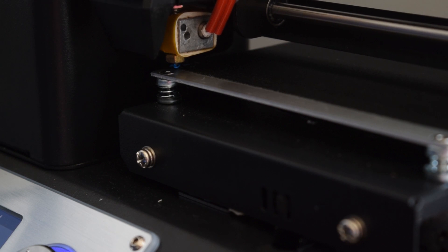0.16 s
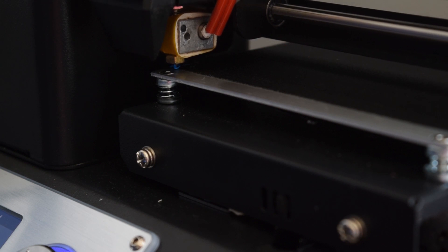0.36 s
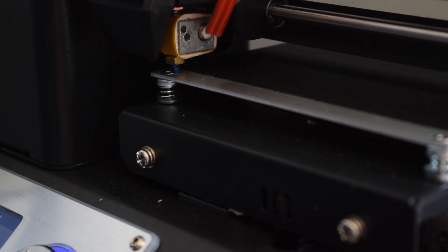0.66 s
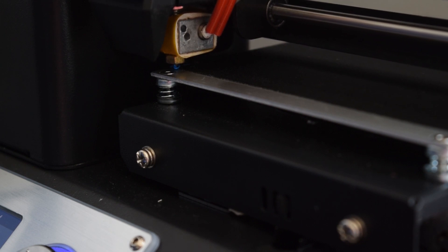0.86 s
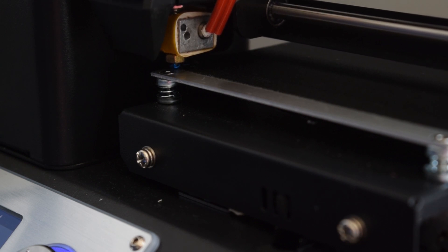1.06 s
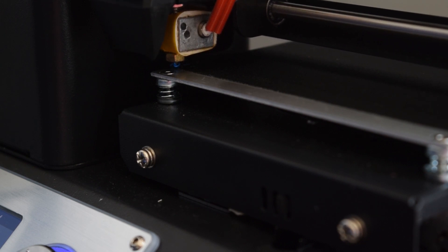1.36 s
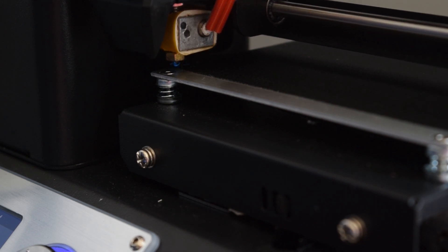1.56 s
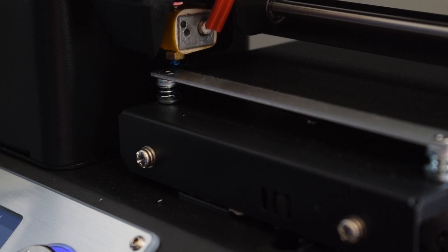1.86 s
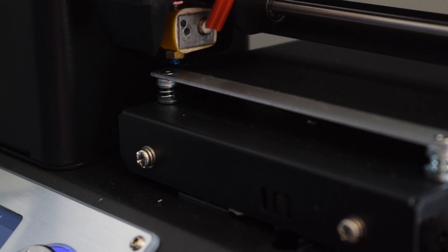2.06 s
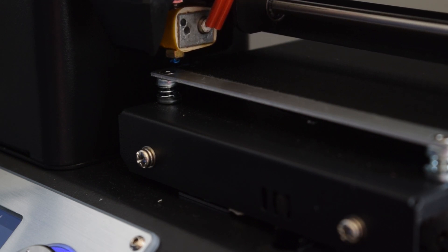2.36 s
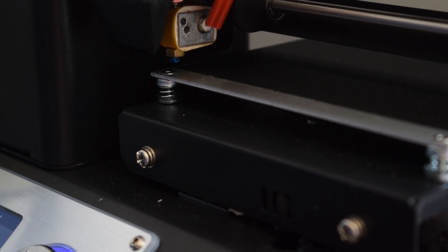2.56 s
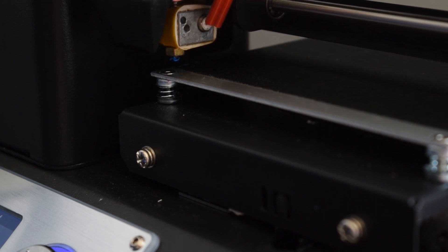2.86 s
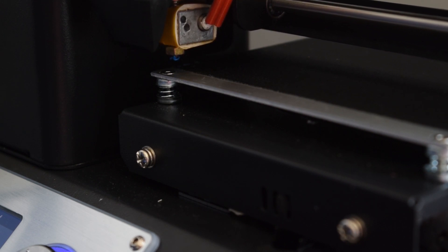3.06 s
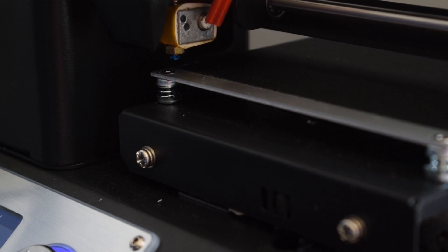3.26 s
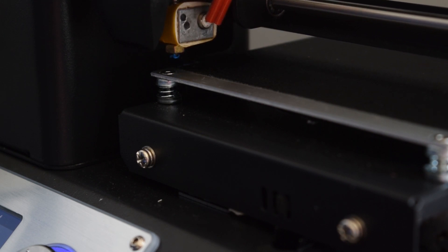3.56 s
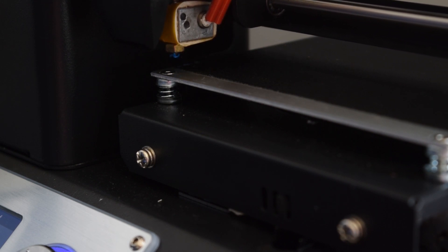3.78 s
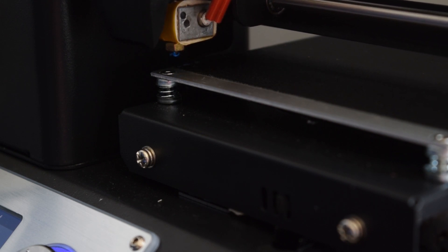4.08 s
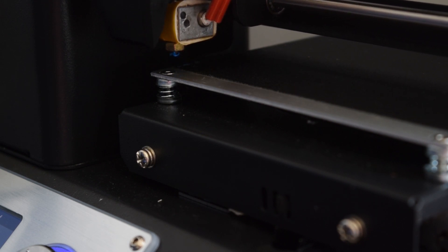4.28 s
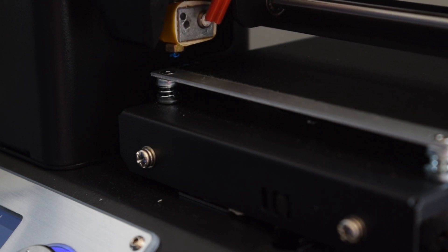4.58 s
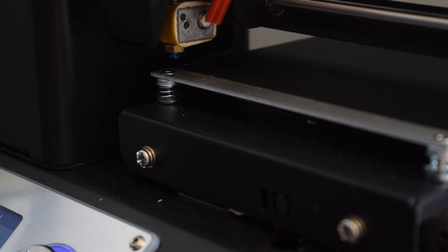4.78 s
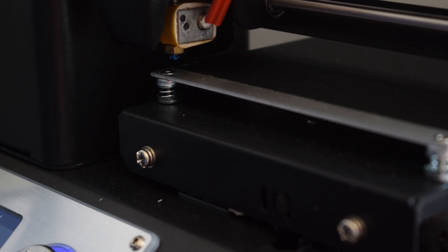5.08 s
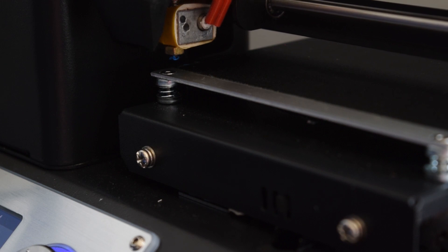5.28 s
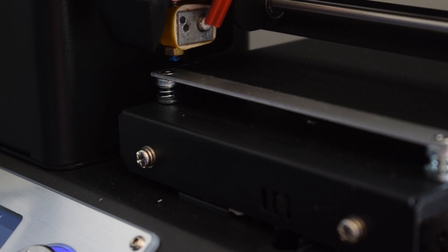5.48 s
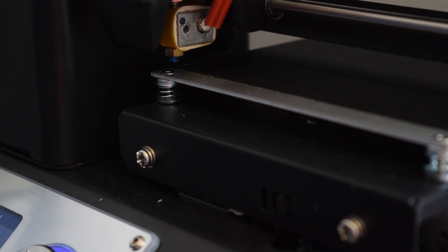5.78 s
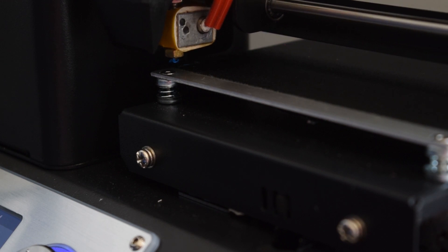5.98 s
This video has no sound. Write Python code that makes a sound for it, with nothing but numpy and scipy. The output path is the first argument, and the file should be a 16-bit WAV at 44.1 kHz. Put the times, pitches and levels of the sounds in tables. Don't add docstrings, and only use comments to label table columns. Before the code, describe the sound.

Close to the microphone in a quiet room, a small desktop printer's fan hums low and airy. After small plastic clicks, a stepper motor spins up into a steady, grainy, multi-toned whine with tiny high squeaks that recur. It stops abruptly, leaving a faint pulsing whine and a click. Then a far louder low thump slams the microphone into clipping, with wobbling bass and a brief rustle, before fan hum and a last click.

```python
import sys
import numpy as np
from scipy import signal
from scipy.fft import rfft, irfft, next_fast_len
from scipy.io import wavfile
from scipy.ndimage import uniform_filter1d, map_coordinates

SR = 44100
rng = np.random.default_rng(int(sys.argv[2]) if len(sys.argv) > 2 else 0)


def digitize_waveform(pressure):
    field = np.atleast_2d(pressure).T
    bounded = np.clip(field, -1, 1)
    quanta = np.round(bounded * 32767).astype(np.int16)
    wavfile.write(sys.argv[1], SR, quanta)


def linear_from_db(decibels):
    return 10 ** (np.asarray(decibels, float) / 20)


N = 270271
T = np.arange(N) / SR
STOP_S = 4.3


def unit(x):
    return x / np.sqrt(np.mean(x ** 2) + 1e-20)


def wobble(rate):
    coarse = T[::32]
    knots = rng.standard_normal(int(N * rate / SR) + 4)
    return np.interp(T, coarse, map_coordinates(knots, [coarse * rate]))


def noise(gain):
    m = next_fast_len(N)
    hz = np.fft.rfftfreq(m, 1 / SR) + 1
    white = rng.standard_normal(len(hz)) + 1j * rng.standard_normal(len(hz))
    return unit(irfft(white * gain(hz), m)[:N])


def shape(points):
    f, db = np.transpose(points)
    return lambda hz: linear_from_db(np.interp(np.log(hz), np.log(f), db, -120, -120))


def peak(centre_hz, width_hz):
    return lambda hz: 1 / (1 + ((hz - centre_hz) / (width_hz / 2)) ** 2)


def resonances(modes):
    return sum(linear_from_db(db) * noise(peak(hz, width_hz)) for hz, width_hz, db in modes)


def tone(hz):
    return np.sqrt(2) * np.sin(2 * np.pi * (np.cumsum(hz + 0 * T) / SR + rng.random()))


def bell(s, width):
    return np.exp(-((T - s) / width) ** 2)


def held(start, attack, hold, release_db, db):
    rise = np.sin(np.pi / 2 * np.clip((T - start) / attack, 0, 1)) ** 2
    fall_db = release_db * np.maximum(T - start - attack - hold, 0)
    return uniform_filter1d(rise * linear_from_db(db - fall_db), size=300)


# t/s, level/dB over rest
SHUDDERS = [
    (.13, 7),
    (.3, 7),
    (.72, 8),
    (1.06, 5),
    (1.33, 3),
    (1.63, 6),
    (4.32, 6),
    (4.75, 4),
    (5.97, 2),
]
# f/Hz, width/Hz, level/dB
CASE_MODES = [(435.6, 58, -2.5), (908, 81, -8.5), (1103, 14, -15.5)]
# f/Hz, level/dB per Hz
AIR_COLOUR = [(59, -55), (100, -13), (166, -8.5), (201, -10.5), (265, -14), (356, -14.5), (579, -14.5),
              (671, -18), (903, -24.5), (1240, -18), (1350, -21.5), (2710, -30.5), (15700, -45.5)]


def fan():
    shudder_db = sum(db * bell(s, .045) for s, db in SHUDDERS)
    sag_db = -20 * bell(.605, .03)
    blade_db = -55.3 + sag_db + 0.32 * wobble(25)
    blade = linear_from_db(blade_db) * tone(197.7 + 0.71 * wobble(8))

    stirred = held(start=5.15, attack=.3, hold=.2, release_db=4, db=-60)
    air_level = np.hypot(linear_from_db(-58.3), stirred)
    air = air_level * linear_from_db(0.4 * wobble(1.8)) * noise(lambda hz: shape(AIR_COLOUR)(hz) * (hz > 100))

    case = linear_from_db(-60) * resonances(CASE_MODES)
    frame_boom = linear_from_db(-62 + shudder_db) * noise(peak(70.6, 20))
    desk_rumble = linear_from_db(-59 + .4 * shudder_db + 2.5 * wobble(9)) * noise(peak(30, 40))
    slow_rumble = linear_from_db(-54) * noise(peak(6, 15))
    return blade + air + case + frame_boom + desk_rumble + slow_rumble


# t/s, level/dB, time to fade by 60 dB/s, f/Hz, width/Hz
CLICKS = [(.195, -67, .5, 9300, 3000), (.2, -64, 0.45, 4930, 3000), (.528, -64, 0.19, 10300, 3000),
          (.528, -65, 0.17, 14500, 4000), (.528, -59, .2, 5000, 5000), (.738, -61, .2, 5700, 2000),
          (.738, -62, 0.2, 11500, 5000), (.98, -69, .6, 8000, 8000), (4.688, -60, 0.52, 7300, 4480),
          (4.97, -73, 0.39, 5500, 4000), (5.762, -57.5, 0.5, 6800, 2800), (5.764, -63.5, .3, 11000, 4000),
          (5.762, -58.5, 0.49, 2330, 1200)]
# (t/s, level/dB, time to fade by 60 dB/s),
# then a list of f/Hz, width/Hz, level/dB
RINGING_PARTS = [
    ((0.529, -57, .2), [(1230, 80, 0), (1880, 120, -6), (2120, 120, -5), (5500, 400, -6), (6500, 120, -10), (10100, 200, -11)]),
    ((0.737, -58.5, .22), [(5270, 90, 3.5), (5600, 300, -3), (6480, 90, -3), (7300, 200, -11), (10900, 400, -8), (12600, 400, -10), (15600, 150, -8)]),
    ((5.764, -59.5, 0.45), [(2430, 200, -2), (6000, 370, 0), (8000, 500, -2), (9870, 200, -10)]),
]


def clicks():
    def dying(s, db, t60):
        age = np.maximum(T - s, 0)
        return linear_from_db(db - 60 * age / t60) * (1 - np.exp(-age / 0.0025))

    out = 0
    for s, db, t60, hz, width_hz in CLICKS:
        out = out + dying(s, db, t60) * noise(peak(hz, width_hz))
    for start, modes in RINGING_PARTS:
        out += dying(*start) * resonances(modes)
    return out


# t/s, length/s, f/Hz, glide/Hz, arch of the pitch/Hz
SQUEAKS = [
    (1.34, .04, 9750, 100, 350),
    (1.38, .045, 9800, 1000, 100),
    (1.487, .068, 9350, -650, 850),
]


def lead_screw():
    out = 0
    for (s, length, hz, glide_hz, arch_hz), db in zip(SQUEAKS, (-82, -75, -77)):
        u = np.clip((T - s) / length, 0, 1)
        arch = np.sin(np.pi * u)
        out = out + linear_from_db(db + 1.5 * wobble(40)) * arch * tone(hz + glide_hz * u + arch_hz * arch)
    return out


def holding_whine():
    beat_db = -9 * np.sin(np.pi * 4.7 * (T - 4.57)) ** 2
    hold_db = -61 - 4 * (T - STOP_S) + beat_db
    return (T > STOP_S) * linear_from_db(hold_db + 1.1 * wobble(30)) * tone(917 + 2.5 * wobble(15))


# t/s, share of full speed
MOTOR_SPEED = [
    (0, .75),
    (.53, .75),
    (.6, .9),
    (.67, 1),
    (7, 1),
]
# f/Hz, level/dB
STEP_TONES = [(242.2, -70), (419.9, -55), (522.2, -74), (559.9, -74), (699.8, -65.5), (742.9, -70.5),
              (839.8, -77), (882.8, -76), (909.8, -72.5), (979.8, -78)]
# f/Hz, level/dB
FRAME_TONES = [(1023, -72), (1120, -74), (1163, -62), (1260, -78), (1303, -78), (1497, -82), (1912, -82),
               (2368, -86), (2423, -85), (1443, -78), (1583, -77), (1863, -81), (2196, -85), (2466, -84)]
# f/Hz, level/dB
DRIVER_TONES = [(2745, -88), (3165, -88), (3736, -88.5), (4005, -91), (4603, -90), (4743, -81.5),
                (4883, -90), (5163, -91), (5351, -89), (5626, -90), (5766, -93), (6600, -94), (7908, -94),
                (8188, -95)]
# f/Hz, level/dB
FAINT_DRIVER_TONES = [(2880, -91), (3020, -93), (3359, -91), (3692, -93), (4155, -93), (5307, -94),
                      (6045, -98), (7348, -98), (7488, -97), (7757, -96), (8048, -97)]
# f/Hz, level/dB per Hz
RAIL_COLOUR = [(300, -24), (500, 1), (900, -0.5), (1250, 1.5), (1340, -10), (1500, -6), (1700, -14.5),
               (1900, -6), (2450, -8.5), (2600, -21), (5000, -22.5), (8000, -23.5), (11000, -30)]
# f/Hz, width/Hz, level/dB
SHELL_MODES = [(3380, 340, -0.5), (5450, 410, -5), (6680, 250, -6.5), (7900, 1100, -2.5)]


def stepper():
    speed = np.interp(T, *np.transpose(MOTOR_SPEED))
    lag = 1 - speed
    running = np.clip((T - .53) / 0.016, 0, 1) * np.clip((STOP_S - T) / .01, 0, 1)
    lock_s = .68
    surge_db = 4 * bell(lock_s, .05)
    load_db = -3 * np.exp(-np.maximum(T - lock_s, 0) / .4)

    out = linear_from_db(-64 + load_db + 0.6 * wobble(11.2)) * noise(shape(RAIL_COLOUR))

    step_hz = 140
    pause_db = -10 * np.cos(np.pi * step_hz / 16 * (T - 1.45)) ** 16
    hiss_per_step = 1 + .5 * tone(step_hz * speed)
    shell = 0
    for hz, width_hz, db in SHELL_MODES:
        shell = shell + linear_from_db(db - 82.5 + .6 * pause_db + 1.5 * wobble(13.9)) * noise(peak(hz, width_hz))
    out += hiss_per_step * shell

    families = (
        (STEP_TONES, -55 - 70 * lag + surge_db + .6 * load_db),
        (FRAME_TONES, -61.8 - 160 * lag + load_db),
        (DRIVER_TONES + FAINT_DRIVER_TONES, -79.5 - 60 * lag + pause_db),
    )
    for lines, level_db in families:
        top_db = max(db for hz, db in lines)
        for hz, db in lines:
            flicker_db = 1.1 * wobble(25.13)
            pitch_hz = hz * speed * (1 + 0.00044 * wobble(18))
            out += linear_from_db(level_db + db - top_db + flicker_db) * tone(pitch_hz)

    growl = noise(lambda hz: peak(400, 150)(hz) + .6 * peak(650, 200)(hz))
    out += linear_from_db(-66) * np.sqrt(4 * lag) * growl
    return out * running + lead_screw() + holding_whine()


# t/s, level/dB, width/s, direction
AIR_PUSHES = [
    (4.31, -40, .005, -1),
    (5.233, -16, .007, -1),
    (5.262, -9, .008, -1),
    (5.2935, -9, .004, -1),
    (5.3, -5, .014, -1),
    (5.412, -10, .004, -1),
]
# t/s, level/dB, width/s, direction, ring of the housing/dB
BLOWS = [
    (5.2712, 11.2, .0053, 1, -7),
    (5.376, -30, .0018, -1, -12.5),
    (5.4205, -12.5, .0032, 1, -13.5),
]
# f/Hz, level/dB per Hz
RUSTLE_COLOUR = [(600, -30), (1200, -7), (2000, -8.5), (3300, -15.5), (4800, -13), (6000, -18.5),
                 (11000, -18.5), (15700, -29)]


def jolt():
    out = sum(way * linear_from_db(db) * bell(s, width) for s, db, width, way in AIR_PUSHES)
    housing_hz, housing_t60 = 61, .28
    lid_hz, lid_t60 = 120, .15
    for s, db, width, way, ring_db in BLOWS:
        age = np.maximum(T - s, 0)
        dying = linear_from_db(-60 * age ** 2 / (age + width) / housing_t60)
        ring = np.where(T < s, bell(s, width), dying * np.cos(2 * np.pi * housing_hz * age))
        lid_rise = np.sin(np.pi * np.minimum(age * lid_hz, .5)) ** 2
        lid = linear_from_db(-14 - 60 * age / lid_t60) * lid_rise * np.sin(2 * np.pi * lid_hz * age)
        out += way * (linear_from_db(db) * bell(s, width) + linear_from_db(ring_db) * ring - lid)

    tight_hz, slack_hz, slacken_s = 57, 31, .04
    free = T - 5.322
    slackened = 1 - np.exp(-np.maximum(free, -slacken_s) / slacken_s)
    turns = slack_hz * free + (tight_hz - slack_hz) * slacken_s * slackened
    out += held(start=5.302, attack=.02, hold=.113, release_db=500, db=-3.5) * np.cos(2 * np.pi * turns)

    sway = held(start=5.46, attack=.03, hold=.26, release_db=450, db=-26)
    settling = held(start=5.2, attack=.05, hold=.8, release_db=40, db=-44)
    out += (.5 * sway + settling) * noise(lambda hz: peak(22, 30)(hz) * peak(0, 110)(hz))
    slowing = 1 + np.exp(np.minimum((T - 5.62) / .025, 50))
    out += sway * tone(14 + (44 - 14) / slowing + 3 * wobble(12))

    rattle = held(start=5.25, attack=.1, hold=.11, release_db=160, db=-25.5)
    out += rattle * noise(shape([(40, -30), (58, 0), (85, 0), (120, -2), (190, -20), (280, -36), (500, -62)]))

    rustle = held(start=5.31, attack=.1, hold=.04, release_db=45, db=-58.5)
    rustle_db = 2.5 * wobble(45) - 90 * np.maximum(T - 5.6, 0)
    return out + rustle * linear_from_db(rustle_db) * noise(shape(RUSTLE_COLOUR))


def scene():
    printer = fan() + clicks() + stepper()
    i = np.arange(N)
    start, length = round(1.25 * SR), 34579
    inside = (i > start + length) & (T < STOP_S)
    place = (i - start) % length
    fade = np.clip(place / (.008 * SR), 0, 1) * np.pi / 2
    again = np.sin(fade) * printer[start + place] + np.cos(fade) * printer[start + place + length]
    return (np.where(inside, again, printer) + jolt())[None]


def band_limit(x):
    return signal.sosfilt(signal.butter(12, 16480, fs=SR, output="sos"), x)


def record(dry):
    spectrum = rfft(np.clip(dry, -1, 1))
    spectrum = spectrum * (np.fft.rfftfreq(N, 1 / SR) < 15750)
    mix = np.clip(irfft(spectrum, N), -1, 1)
    return band_limit(mix)


dry = scene()
out = record(dry)
digitize_waveform(out)
```